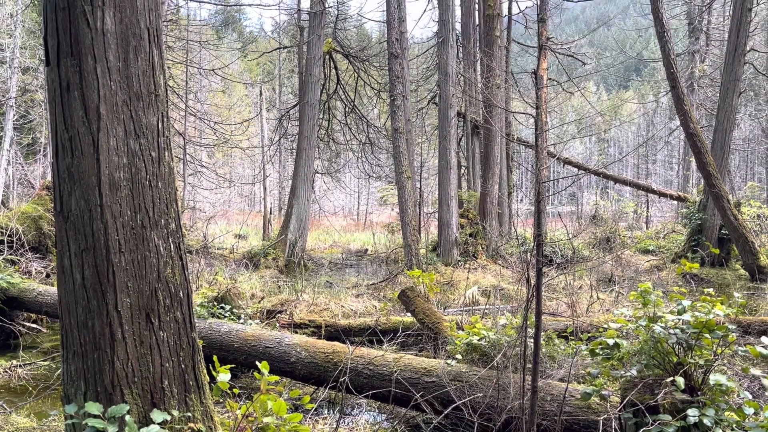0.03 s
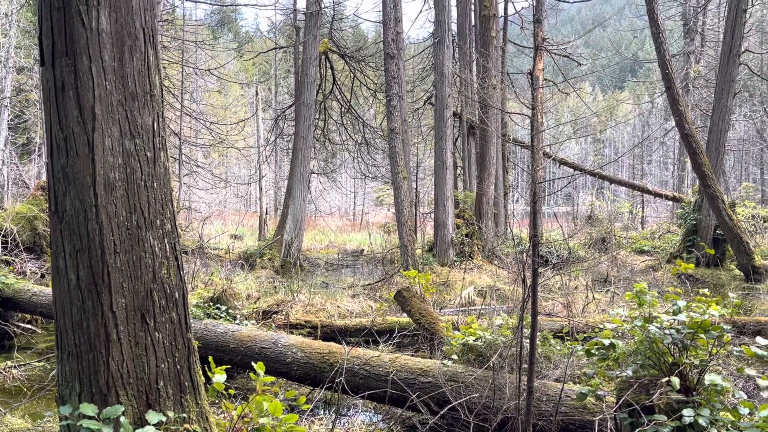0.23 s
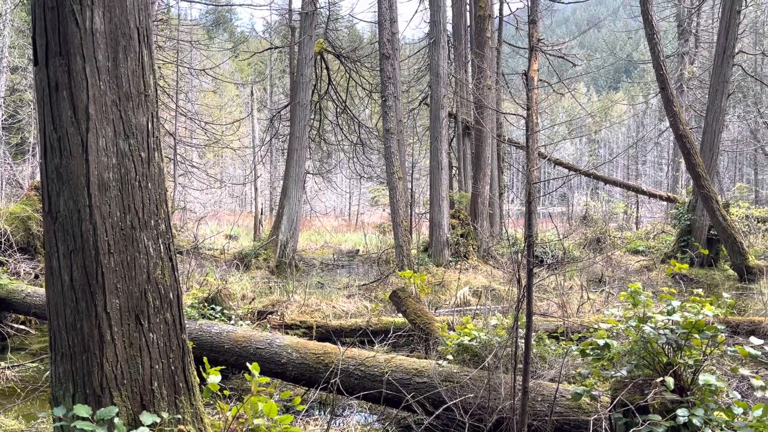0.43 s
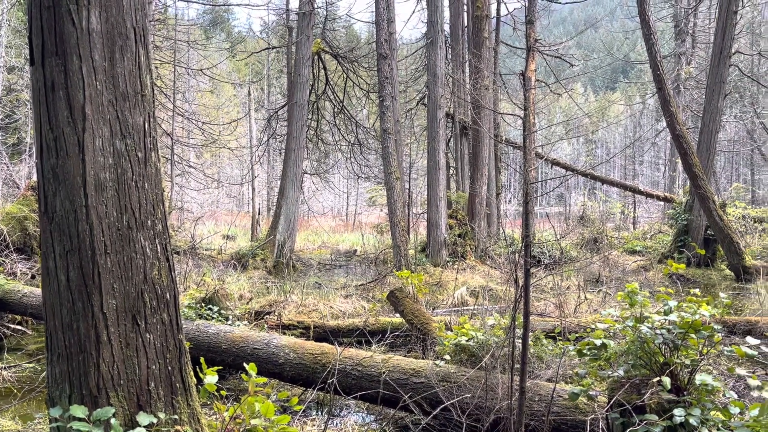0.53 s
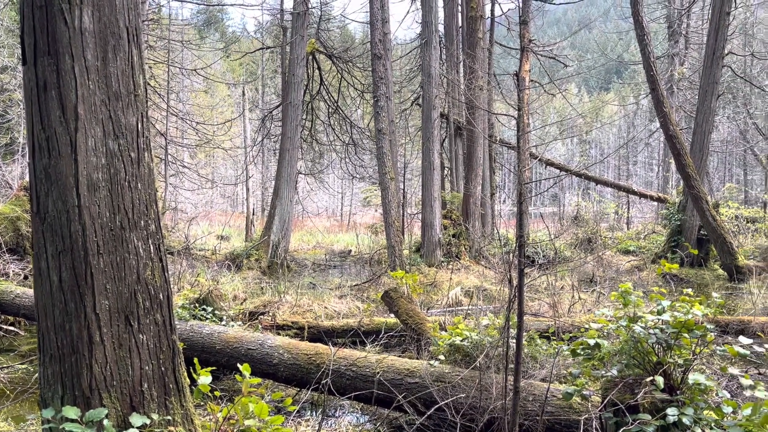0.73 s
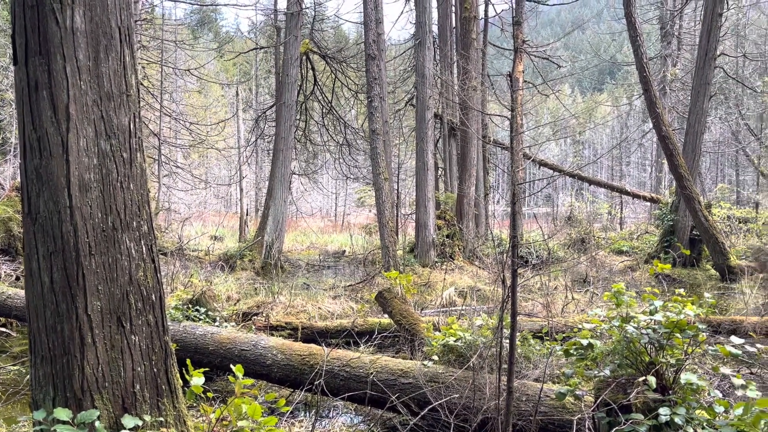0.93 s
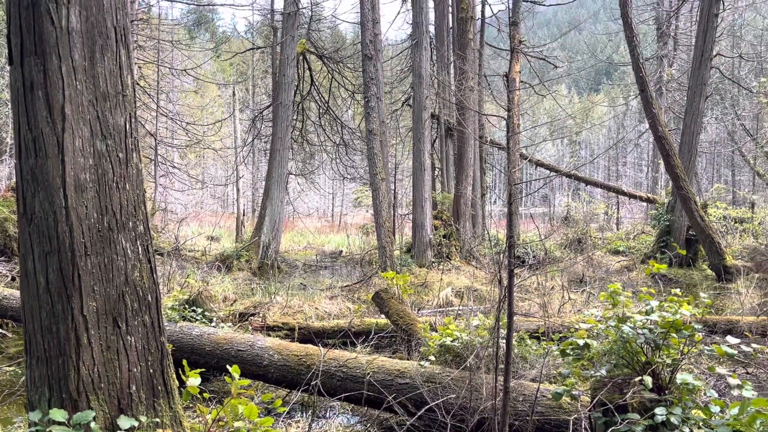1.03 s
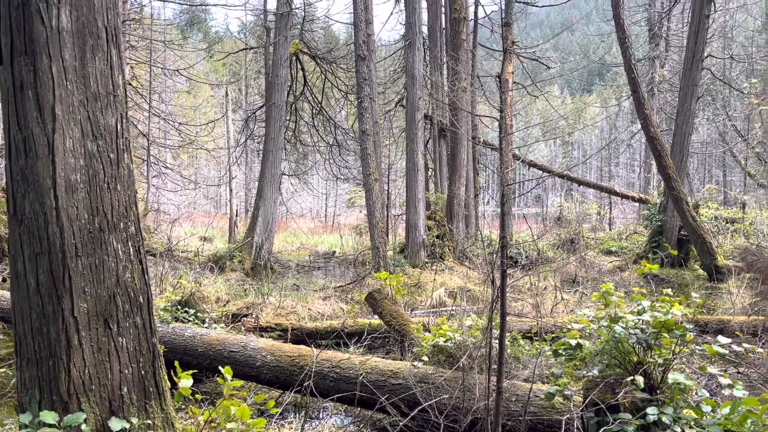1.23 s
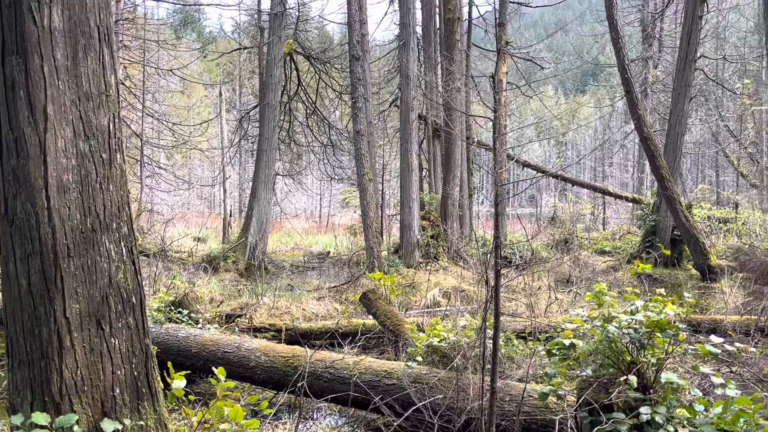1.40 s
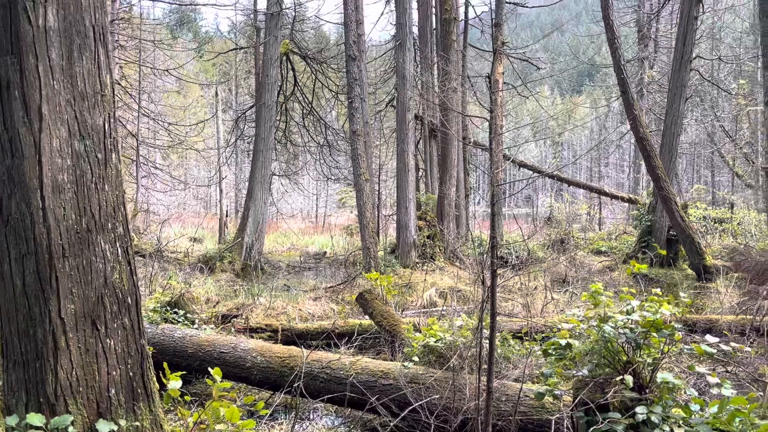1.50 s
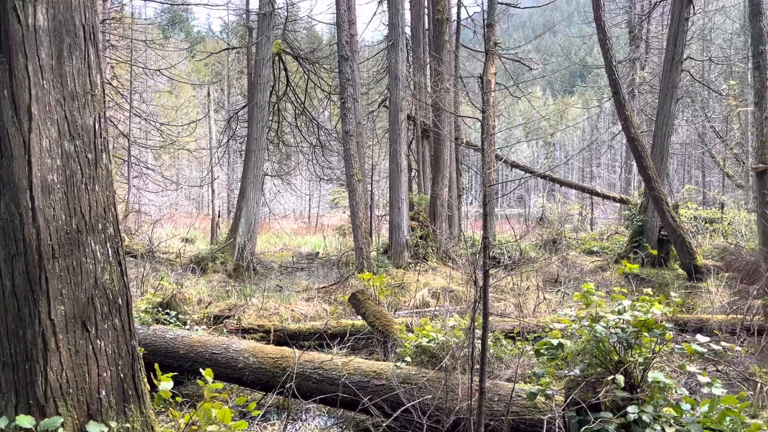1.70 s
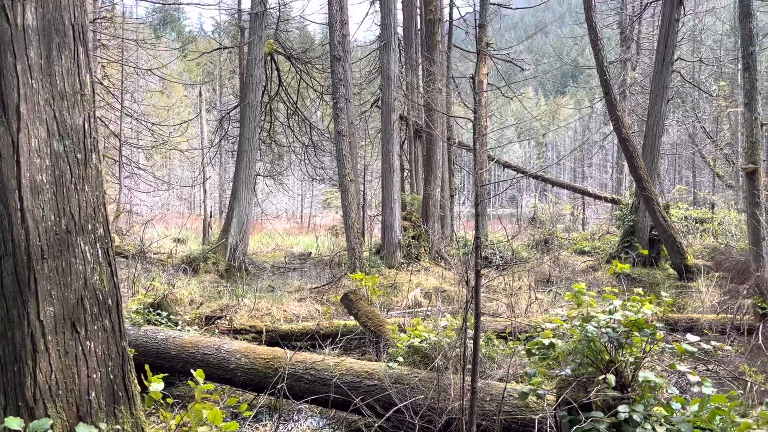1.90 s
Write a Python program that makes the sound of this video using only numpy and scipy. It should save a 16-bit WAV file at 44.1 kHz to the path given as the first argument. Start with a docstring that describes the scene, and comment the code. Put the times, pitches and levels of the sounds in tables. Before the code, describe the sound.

Tree frog croaks close by in two short raspy bursts, over a distant frog chorus in marshy woods

```python
"""A wooded marsh at close range: one tree frog croaks near the microphone, a train of short pulses, then four more
after a gap. Pulsed larynx tones set its vocal sac ringing. Neighbours answer with pulsed notes from farther
off, smeared by the trunks, and a chorus of many such notes runs on behind them.
A distant engine, probably a propeller plane, drones as five harmonics over a low rumble of shaped noise;
brief high chirps and faint noise ticks sound too."""
import sys
import numpy as np
from scipy import signal
from scipy.fft import rfft, irfft
from scipy.io import wavfile

SR = 44100
rng = np.random.default_rng(int(sys.argv[2]) if len(sys.argv) > 2 else 0)


def dump_mix(stems):
    """Bounce the given channels to the path in sys.argv[1] as a 16-bit WAV at rate SR."""
    frames = np.atleast_2d(stems).T  # one column per channel
    limited = np.clip(frames, -1, 1)  # hard clip at full scale
    pcm = np.round(limited * 32767).astype(np.int16)
    wavfile.write(sys.argv[1], SR, pcm)


N = 85995
T = np.arange(N) / SR

PULSE_RISE, PULSE_FALL = 1.6, 3.21  # powers that shape one pulse
SAC_SAG = 0.033  # share of its pitch that the sac's ring drops in a pulse
WOOD_T60_S, WOOD_BUILD_S = 0.51, .015  # the scatter's decay by 60 dB, and the time it takes to gather
WOOD_WIDTH = .6  # side over mid


def undb(db):
    """Decibels to gain."""
    return 10 ** (np.asarray(db) / 20)


def level(x, db):
    """Scale to an rms level."""
    rms = np.sqrt(np.mean(x ** 2) + 1e-20)
    return x * undb(db) / rms


def pan(x, db):
    """Place a sound by its left-right level difference."""
    return x * undb(np.array([[db], [-db]]) / 2)


def add(out, start, x):
    """Mix a sound in at a time, cutting what falls outside."""
    i = int(start * SR)
    a, b = max(i, 0), min(i + x.shape[-1], out.shape[-1])
    if b > a:
        out[..., a:b] += x[..., a - i:b - i]


def walk(rate, n):
    """Random wander of spread near 1, with a new target rate times a second."""
    return np.interp(np.arange(n) / SR * rate, np.arange(256), rng.standard_normal(256))


def curve(points):
    """Value at each sample from (s, value) points."""
    return np.interp(T, *np.array(points).T)


def per_bin(points):
    """Value at each frequency bin from (Hz, value) points, along a log frequency scale."""
    hz, value = np.array(points).T
    return np.interp(np.log(np.arange(N // 2 + 1) * SR / N + 1), np.log(hz), value)


def wood(x, echo_db):
    """The sound plus its dense, dying scatter from the trunks."""
    t = T[:SR // 2]
    envelope = np.exp(-np.log(1000) * t / WOOD_T60_S) * (1 - np.exp(-t / WOOD_BUILD_S))
    mid, side = rng.standard_normal((2, len(t))) * envelope
    tail = np.array([mid + WOOD_WIDTH * side, mid - WOOD_WIDTH * side])
    tail /= np.sqrt(np.sum(tail ** 2) / 2)
    scatter = signal.fftconvolve(x, tail, axes=1)[:, :x.shape[1]]
    return x + undb(echo_db) * scatter


def swell(u):
    """One pulse over u = 0..1: quick rise, slower fall, peak 1."""
    u = np.clip(u, 0, 1)
    shape = u ** PULSE_RISE * (1 - u) ** PULSE_FALL
    return shape / shape.max()


def larynx(hz, partials, rough):
    """A tone with harmonics, its pitch fluttering by the share rough."""
    fluttering_hz = hz * (1 + rough * walk(900, len(hz)))
    phase = 2 * np.pi * np.cumsum(fluttering_hz) / SR + rng.uniform(0, 2 * np.pi)
    return sum(undb(db) * np.sin(round(k) * phase) for k, db in partials)


def close_frog():
    """Each push of air gives a raspy, falling larynx tone and sets the vocal sac ringing."""
    # pulses near the microphone: t/s, length/s, sac ring f/Hz, sac peak level/dB, larynx f/Hz
    croak = [(0.4895, .011, 1490, -50, 1000), (0.526, 0.01, 1846, -41.5, 856),
             (0.5456, 0.016, 1890, -39.5, 830), (0.562, 0.011, 1893, -34, 858),
             (0.5788, 0.013, 1970, -32.5, 840), (0.5971, 0.013, 1950, -28.5, 893),
             (0.614, 0.015, 1988, -27, 933), (0.6326, 0.014, 2000, -27, 951),
             (.6552, 0.014, 1957, -35.5, 805), (0.768, 0.015, 2014, -24, 895),
             (.7860, .015, 2037, -22, 965), (0.8016, 0.017, 2079, -23, 1007),
             (0.814, 0.01, 2032, -30.5, 958)]
    # partials of the sac's ring: multiple of half the ring pitch, level/dB
    voice = [(2, 0), (3, -28.5), (4, -51.5)]
    # colour of the breath noise: f/Hz, relative level per Hz/dB
    rasp_colour = [(400, -30), (750, -2.5), (1500, 0), (2800, -3.5), (3500, -9.5), (4500, -24), (7000, -52),
                   (11000, -70)]
    larynx_db, larynx_growth = -34, 0.45  # level for a 0 dB pulse, dB gained per dB of the pulse
    larynx_sag, larynx_lead_s = 0.22, .0012  # share of pitch dropped in a pulse, lead over the sac
    rasp_db = -11  # against the larynx

    tones, airflow = np.zeros((2, N))
    for start, length, sac_hz, db, larynx_hz in croak:
        u = np.linspace(0, 1, int(length * SR))
        half_ring_hz = sac_hz / 2 * (1 + SAC_SAG * (.5 - u))
        add(tones, start, undb(db) * swell(u) * larynx(half_ring_hz, voice, rough=0.011))
        push = undb(larynx_db + larynx_growth * db) * swell(u)
        falling_hz = larynx_hz * (1 + larynx_sag * (.5 - u))
        push_start = start - larynx_lead_s
        add(tones, push_start, push * larynx(falling_hz, [(1, 0.00065)], rough=0.0253))
        add(airflow, push_start, push)
    breath = irfft(rfft(rng.standard_normal(N)) * undb(per_bin(rasp_colour)), N)
    rasp = airflow * level(breath, rasp_db)
    return wood(pan(tones + rasp, -0.4), echo_db=-17)


def note(length, hz, pulse_hz, low_db):
    """A pulsed note that swells and climbs in pitch, the sac ringing an octave over the larynx; rms 1."""
    # overtones above the sac's ring: multiple of the larynx pitch, level against the ring/dB
    overtones = [(3, -29), (4, -58)]
    climb, larynx_sag = .05, 0.1579  # shares of pitch: gained over the note, dropped by the larynx per period
    pulse_duty, hum_share = 0.757, 0.081  # open share of a period, tone that carries on between pulses
    edge_s, swell_power = .002, .5

    u = np.linspace(0, 1, int(length * SR))
    cycle = np.cumsum(pulse_hz * (1 + 0.068 * walk(60, len(u)))) / SR % 1  # place within each pulse period
    pitch = hz / 2 * (1 + climb * (u - .5))
    sac_pitch = pitch * (1 + SAC_SAG * (.5 - cycle))
    sac = larynx(sac_pitch, [(2, 0.0034), *overtones], rough=.018)
    low_pitch = pitch * (1 + larynx_sag * (pulse_duty / 3 - cycle))
    low = larynx(low_pitch, [(1, low_db)], rough=0.041)
    pulsing = hum_share + swell(cycle / pulse_duty)
    arch = np.abs(np.sin(np.pi * u)) ** swell_power
    edges = signal.windows.tukey(len(u), 2 * edge_s / length)
    return level((sac + low) * pulsing * arch * edges, 0)


def neighbours():
    """Single pulsed notes from frogs farther off, blurred by strong scatter from the trunks."""
    # t/s, length/s, sac f/Hz, pulse rate/Hz, level before the trim/dB, fundamental against the sac/dB,
    # left-right level/dB
    calls = [(.060, 0.028, 2188, 33, -47, -13, 1.5), (.134, .022, 2210, 70, -44.5, -10, 1),
             (0.202, 0.045, 2252, 67, -43.5, -5, -1.5), (.255, 0.07, 2275, 65, -46, -3, 0.5),
             (0.311, 0.067, 1973, 67, -44, -19, -1.5), (0.357, 0.078, 2305, 62.6, -40.5, -10.5, -1.5),
             (0.511, 0.018, 2140, 84, -36, -15, -0.5), (0.525, 0.025, 2128, 85, -38, -11, -0.5),
             (0.694, 0.034, 2466, 90, -43.5, -1.5, 3.5), (.717, .024, 2460, 30, -39.5, -17.5, 0.5),
             (.727, .034, 2620, 21, -39, -16, 3), (0.719, 0.039, 2183, 55, -36, -16, 3),
             (1.157, .065, 2215, 87, -47.5, 4.5, -0.5), (1.219, 0.069, 1784, 75, -51.5, 12.5, 0),
             (1.269, .075, 1997, 77, -45, 2, -0.5), (1.306, 0.047, 2165, 100, -39, -12.5, 0.5),
             (1.374, 0.025, 2258, 46, -41, -11.5, 3.5), (1.408, 0.085, 2171, 67, -38, -8.5, 2),
             (1.433, 0.047, 1978, 77, -43, -3.5, -2), (1.494, 0.027, 2140, 101, -47.5, -17, 2.5),
             (1.567, 0.044, 2310, 98, -38.5, -4.5, 2), (1.572, 0.078, 2100, 75, -42.5, -16.5, 6.5),
             (1.73, 0.091, 2652, 74, -58, -14, 1)]
    trim_db = -9.5
    out = np.zeros((2, N))
    for start, length, hz, pulse_hz, db, low_db, pan_db in calls:
        call = note(length, hz, pulse_hz, low_db)
        add(out, start, pan(call, pan_db) * undb(db + trim_db))
    return wood(out, echo_db=-4)


def chorus():
    """Many far frogs' notes, each with its own pitch, pace and strength, already calling at the start."""
    # slow swell of the whole chorus: t/s, level change/dB
    chorus_swell = [(0, -1.5), (.4, 1.5), (.7, 0), (1.05, 1), (1.45, 0.5), (1.54, -1), (1.66, -1),
                    (1.76, -2), (1.83, 2.5), (1.95, -3.5)]
    notes_per_s, note_s = 55, 0.0893
    sac_hz, pitch_spread, pulse_hz = 2207.7, .055, 78.25  # the spread is a share of the pitch
    scatter_db, chorus_db = 1.5, -50.5  # loudness spread between notes, level before the slow swell

    out = np.zeros((2, N + SR))  # one extra second ahead, dropped below
    for k in range(int(notes_per_s * out.shape[1] / SR)):
        late, size, pitch, pace, loud, side = np.clip(rng.standard_normal(6), -2, 2)
        length = note_s * np.exp(.3 * size)
        hz = sac_hz * (1 + pitch_spread * pitch)
        call = note(length, hz, pulse_hz * np.exp(.15 * pace), low_db=-10.5)
        add(out, (k + late) / notes_per_s, pan(call, 2 * side) * undb(scatter_db * loud))
    blurred = wood(out, echo_db=3.5)[:, -N:]
    return level(blurred, chorus_db) * undb(curve(chorus_swell))


def chirps():
    """Thin high swelling tones with fluttering pitch, probably a bird, and an echo from the trees."""
    # t/s, length/s, f/Hz, peak level/dB
    chirp_notes = [(0.715, .012, 8190, -80), (0.734, 0.013, 7960, -76), (0.834, 0.033, 8230, -86)]
    out = np.zeros(N)
    for start, length, hz, db in chirp_notes:
        u = np.linspace(0, 1, int(length * SR))
        fluttering_hz = hz * (1 + 0.016 * walk(700, len(u)))
        tone = np.sin(2 * np.pi * np.cumsum(fluttering_hz) / SR)
        add(out, start, undb(db) * swell(u) * tone)
    return wood(pan(out, 0), echo_db=-0.5)


def ticks():
    """Tiny dry ticks in the undergrowth, perhaps twigs: bands of noise that start at once and die away."""
    # t/s, centre f/Hz, width f/Hz, decay/s, rms level before the decay/dB
    tick_grains = [(0.054, 11000, 2480, 0.0023, -71.5), (1.794, 5500, 1180, 0.014, -80.5)]
    out = np.zeros(N)
    hz = np.arange(N // 2 + 1) * SR / N
    for start, centre, width, decay, db in tick_grains:
        band = np.exp(-2 * ((hz - centre) / width) ** 2)
        grain = irfft(rfft(rng.standard_normal(N)) * band, N)
        add(out, start, level(grain, db) * np.exp(-T / decay))
    return out


def drone():
    """Five harmonics of a distant engine, each varying and shifting by itself on the long path."""
    # fundamental: t/s, f/Hz
    pitch = [(0, 99.5), (.5, 99.3), (.9, 98.92), (1.95, 98.2)]
    # one fading curve for each of the first four harmonics: t/s, rms level before the waver/dB
    fades = [
        [(0, -70.5), (.12, -54), (.3, -67), (.4, -57.5), (.73, -51.5), (.86, -52.5), (.93, -60), (1.02, -55.5),
         (1.15, -58.5), (1.27, -76), (1.38, -59), (1.48, -54), (1.68, -60.5), (1.79, -69), (1.95, -52)],
        [(0, -54.5), (.22, -48.5), (.32, -51.5), (.39, -62), (.49, -49.5), (.65, -65), (.83, -65), (.9, -72.5),
         (1.2, -58.5), (1.3, -69), (1.95, -65.5)],
        [(0, -77), (.1, -77.5), (.19, -59.5), (.33, -60), (.39, -65.5), (.72, -58), (.86, -71), (.94, -60.5),
         (1.13, -68.5), (1.22, -62.5), (1.41, -55), (1.52, -61.5), (1.63, -59), (1.95, -59)],
        [(0, -81), (.45, -69.5), (.63, -74), (.87, -81), (.98, -67.5), (1.16, -70), (1.36, -61.5),
         (1.55, -65.5), (1.65, -81.5), (1.95, -73.5)],
    ]
    # each harmonic at the two sides: left-right level/dB, left lead/rad, wander of the lead/rad
    sides = [(-3, 0.2, 0.092), (-8.5, 0.4, 0.63), (-2.5, -0.2, .7), (-5, -0.4, 0.56), (-0.5, 0.2, 0.79)]
    fifth_db, waver_db = -82, 2.5  # level of the fifth harmonic before its waver, waver of all five

    phase = 2 * np.pi * np.cumsum(curve(pitch)) / SR
    levels = [curve(fade) for fade in fades] + [fifth_db]
    out = np.zeros((2, N))
    for k, (db, (pan_db, lead, wander)) in enumerate(zip(levels, sides)):
        shift = np.array([[.5], [-.5]]) * (lead + wander * walk(2.7, N))
        tone = np.sqrt(2) * np.sin((k + 1) * phase + shift + rng.uniform(0, 2 * np.pi))
        out += pan(tone * undb(db + waver_db * walk(15, N)), pan_db)
    return out


def air():
    """Low outdoor rumble and a faint, wide hiss, both from shaped noise."""
    # f/Hz, relative level per Hz/dB
    air_colour = [(25, -18), (45, -0.5), (75, 5), (120, -4), (170, -0.5), (250, -4), (330, -4), (450, -13),
                  (650, -19), (1500, -16), (2800, -23), (3500, -22), (4300, -37.5), (6500, -49),
                  (8500, -45.5), (11000, -52), (13000, -62.5)]
    # f/Hz, side over mid
    air_width = [(40, 0.074), (90, 0.16), (160, 1), (500, 1), (1500, 0.97), (4000, 0.9)]
    mid, side = rfft(rng.standard_normal((2, N))) * undb(per_bin(air_colour))
    side = side * per_bin(air_width)
    return level(irfft(np.array([mid + side, mid - side]), N), -59.5)


def scene():
    """Frogs near and far, chirps and ticks over the drone and the air."""
    return close_frog() + neighbours() + chorus() + chirps() + ticks() + drone() + air()


def record(dry):
    """The recorder cuts the top with a steep low-pass at 15300 Hz."""
    return signal.sosfilt(signal.ellip(8, .2, 70, 15300, fs=SR, output="sos"), dry)


dry = scene()
out = record(dry)
dump_mix(out)
```